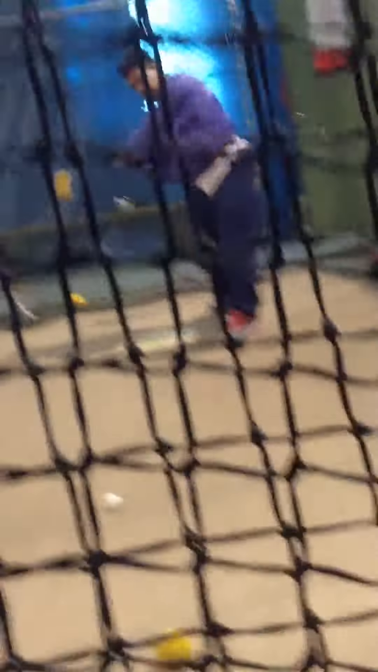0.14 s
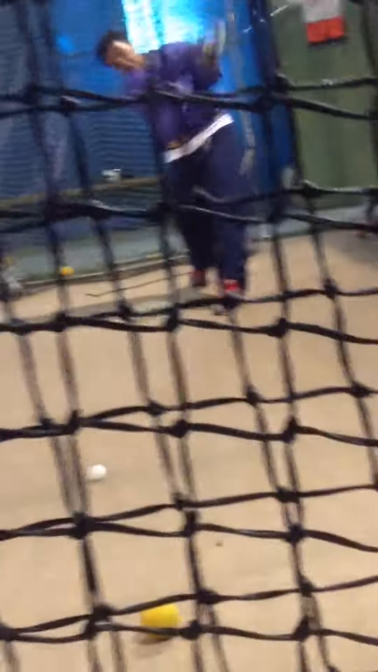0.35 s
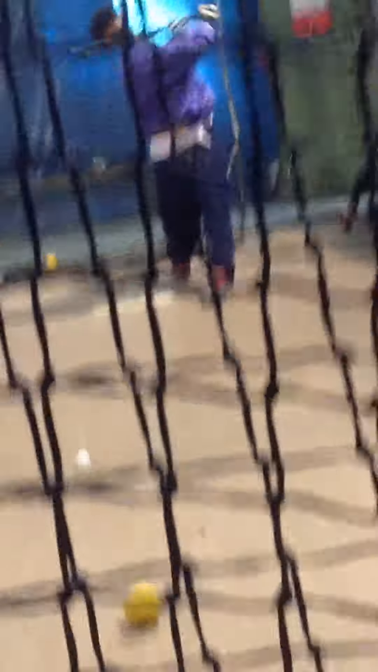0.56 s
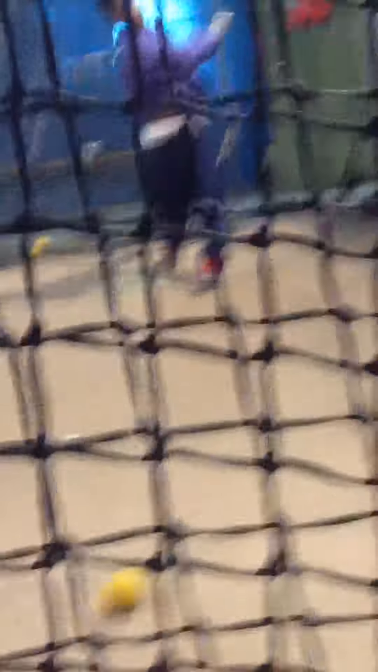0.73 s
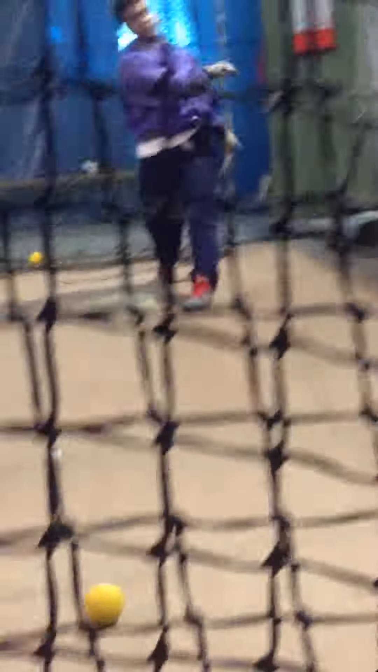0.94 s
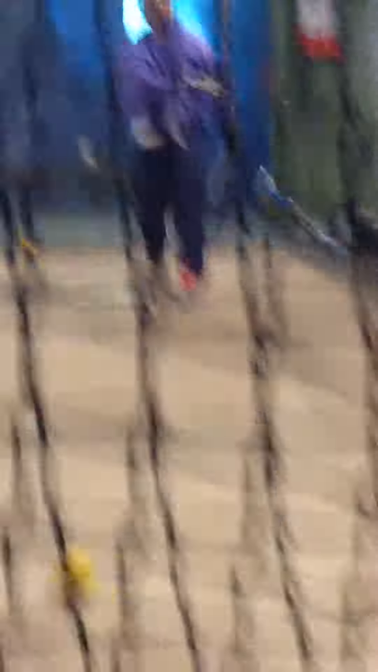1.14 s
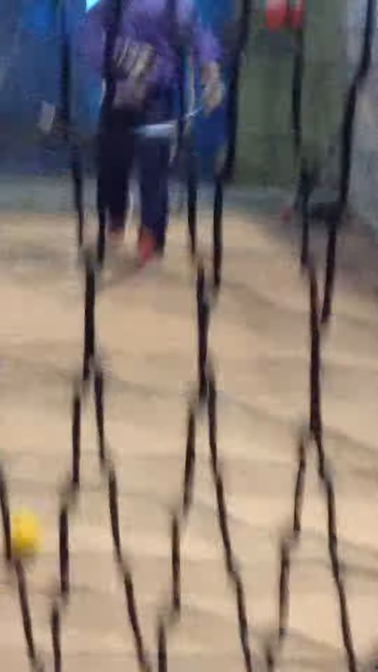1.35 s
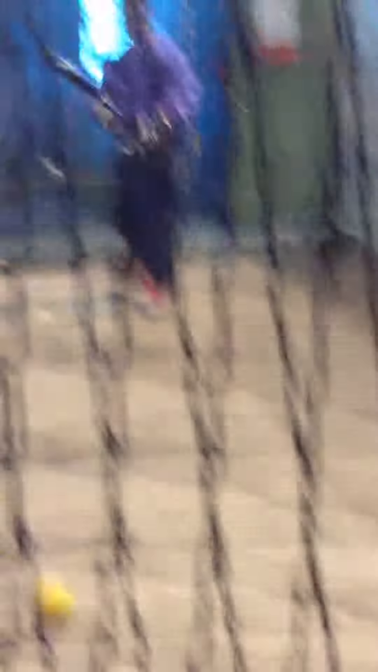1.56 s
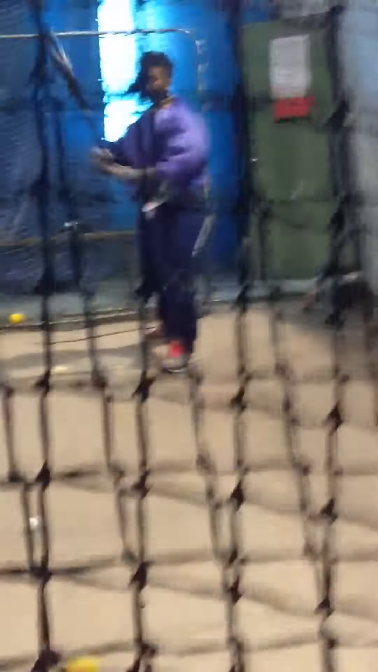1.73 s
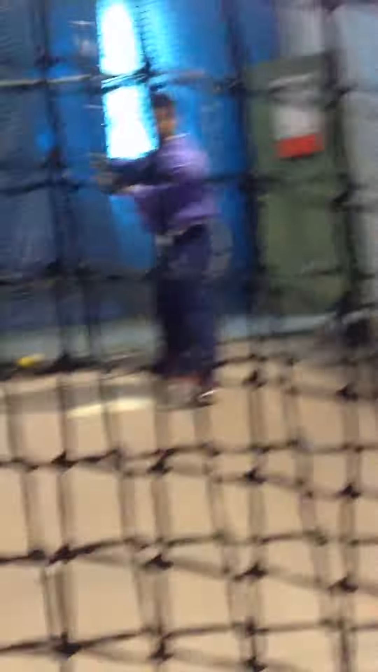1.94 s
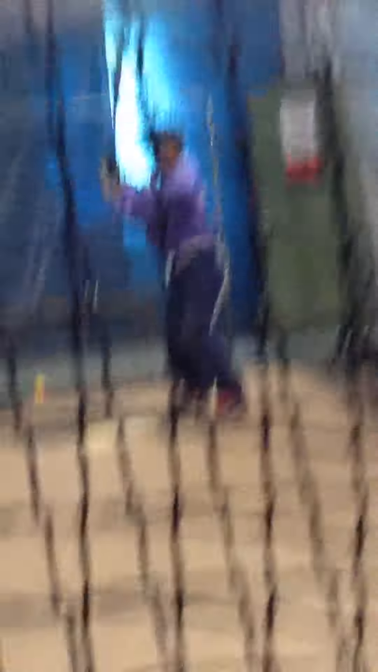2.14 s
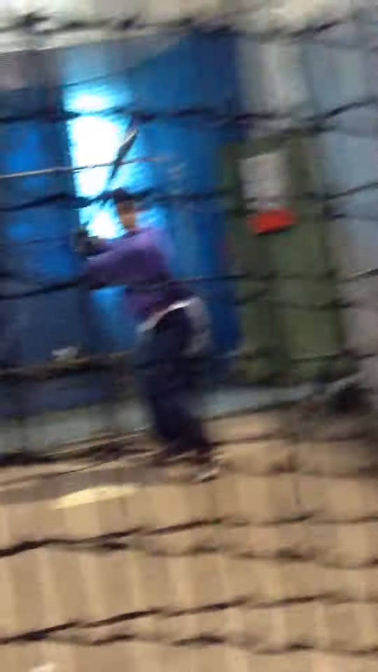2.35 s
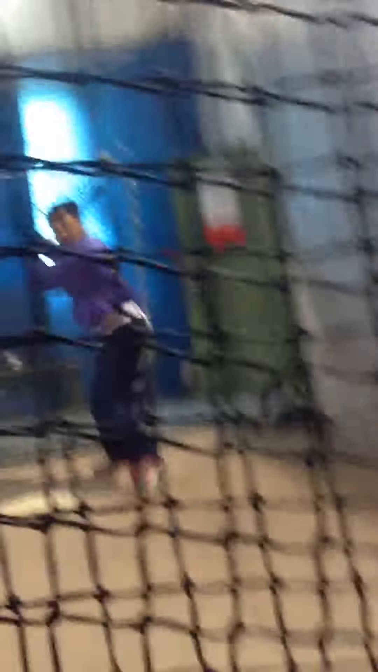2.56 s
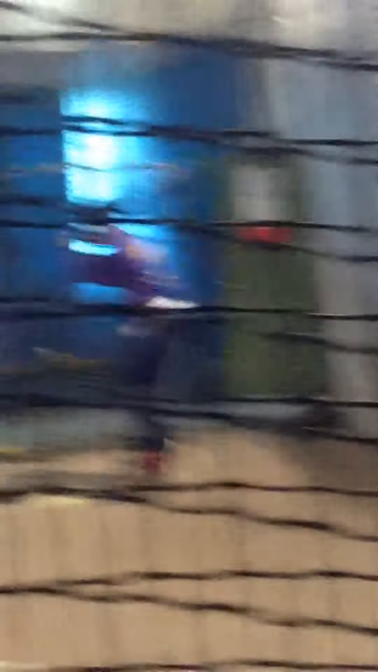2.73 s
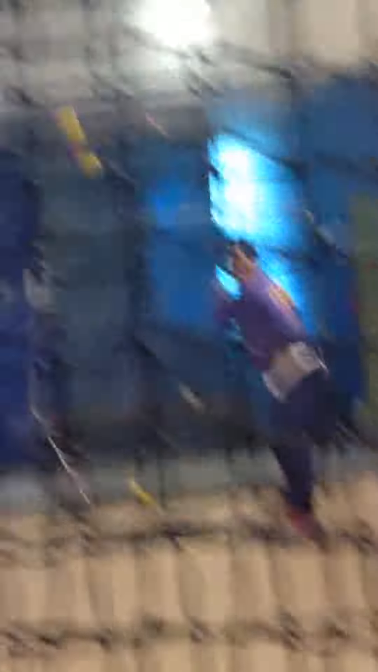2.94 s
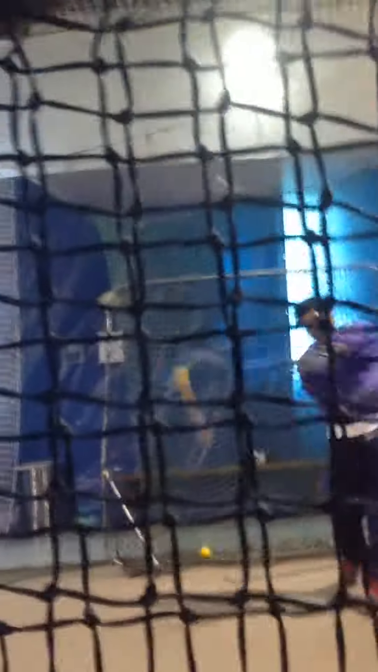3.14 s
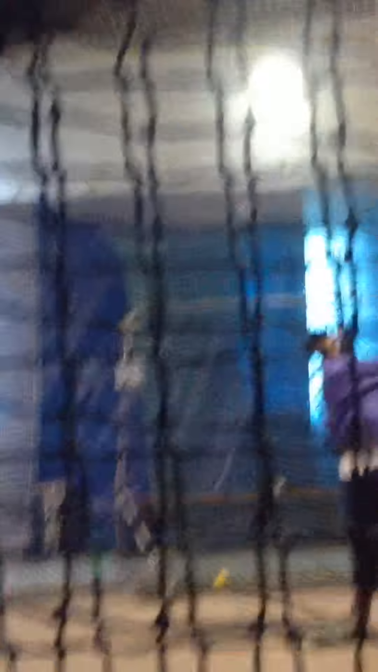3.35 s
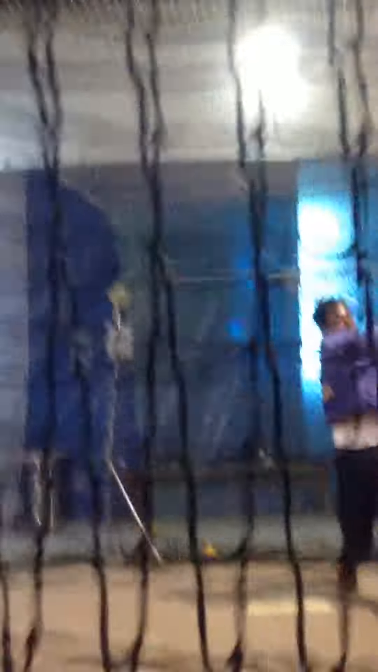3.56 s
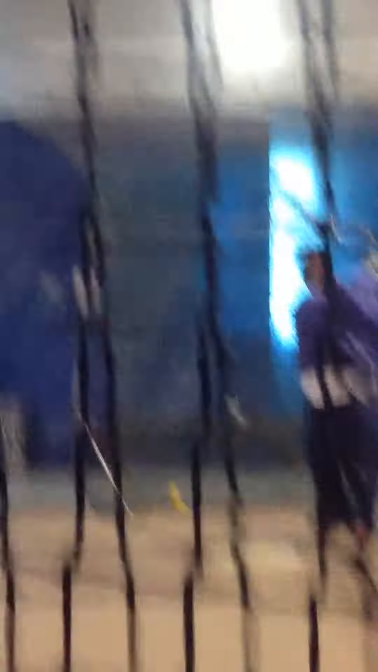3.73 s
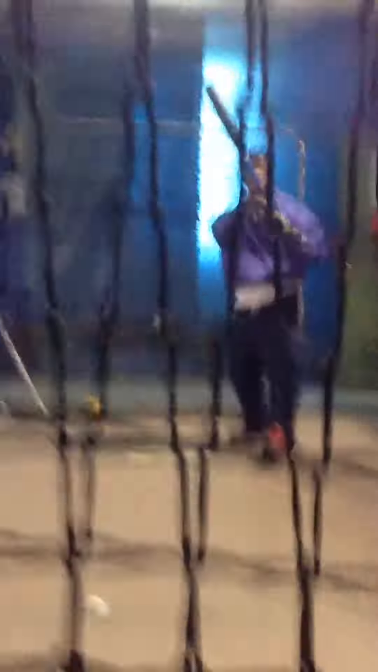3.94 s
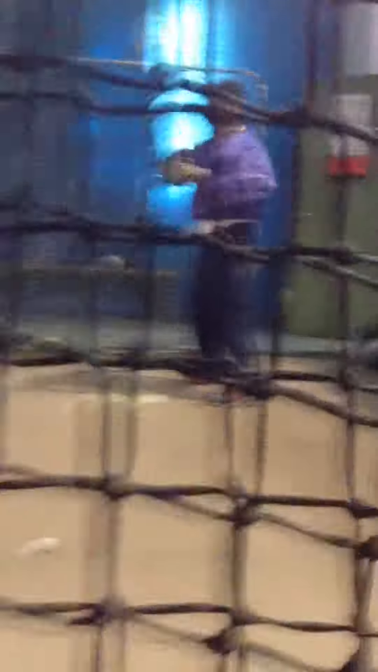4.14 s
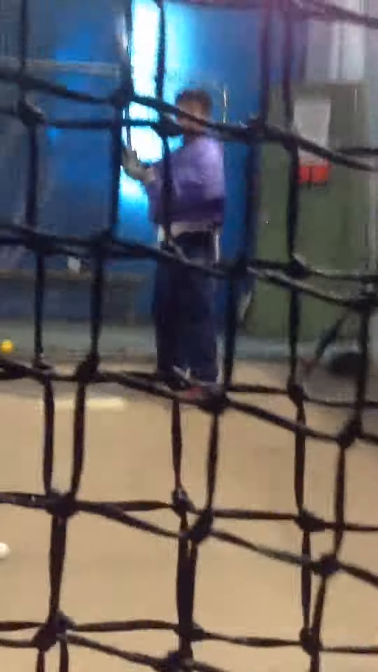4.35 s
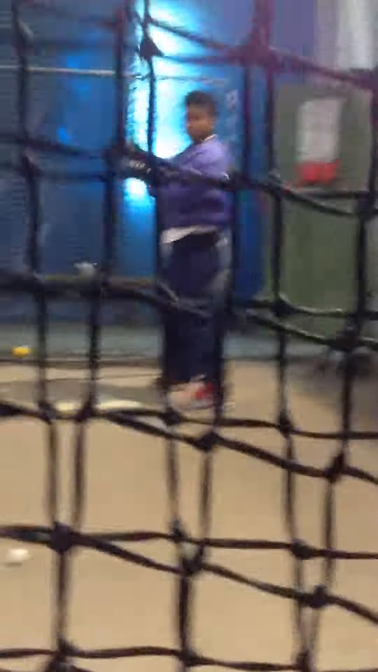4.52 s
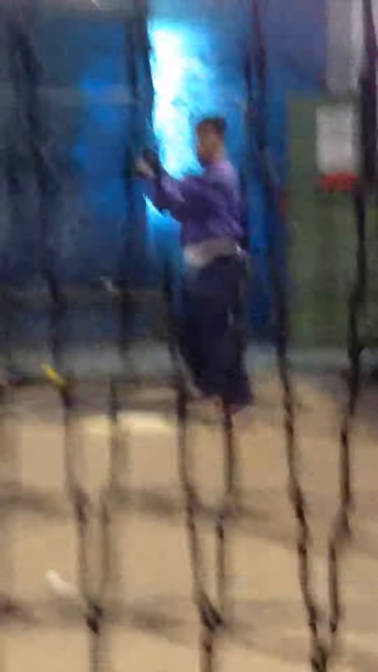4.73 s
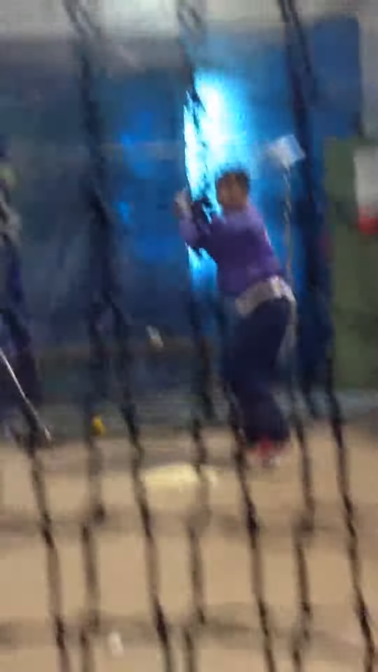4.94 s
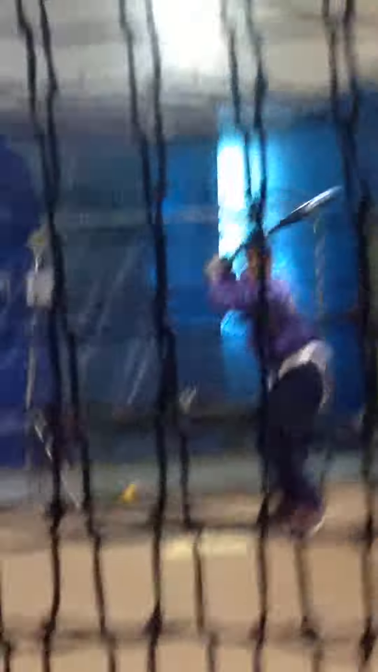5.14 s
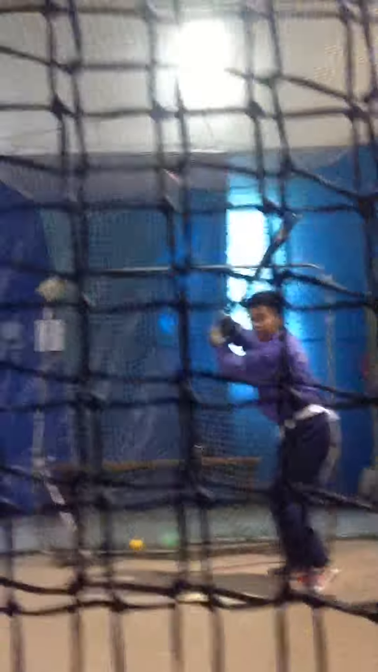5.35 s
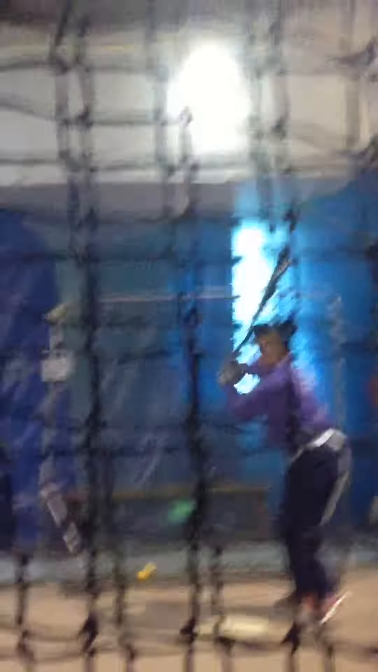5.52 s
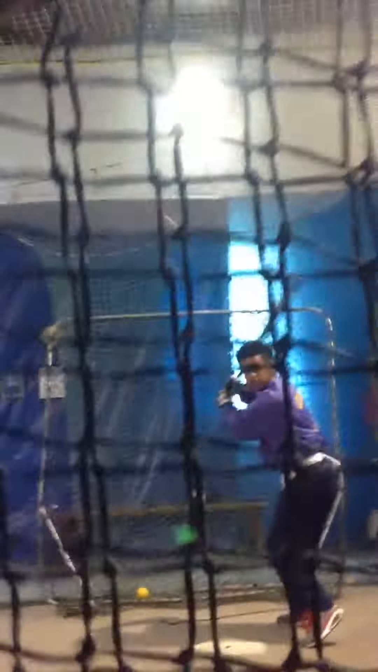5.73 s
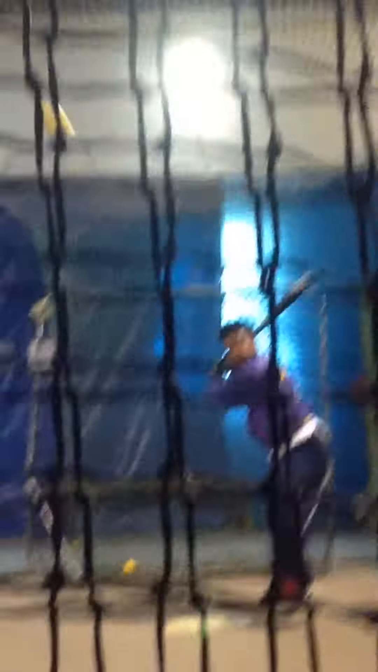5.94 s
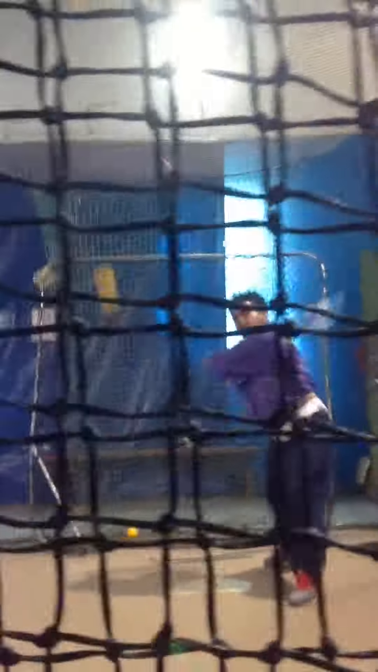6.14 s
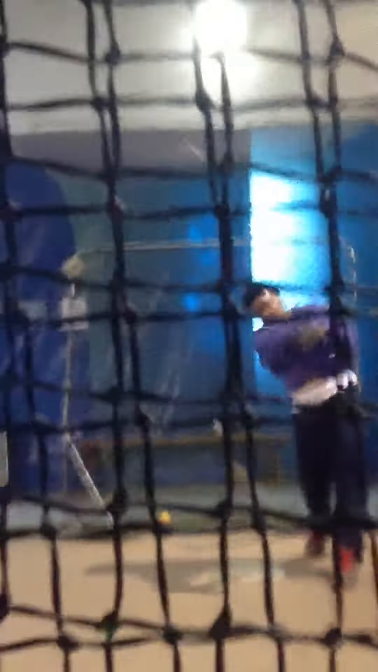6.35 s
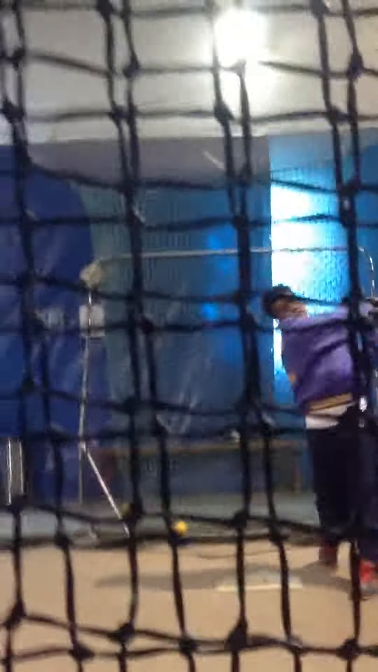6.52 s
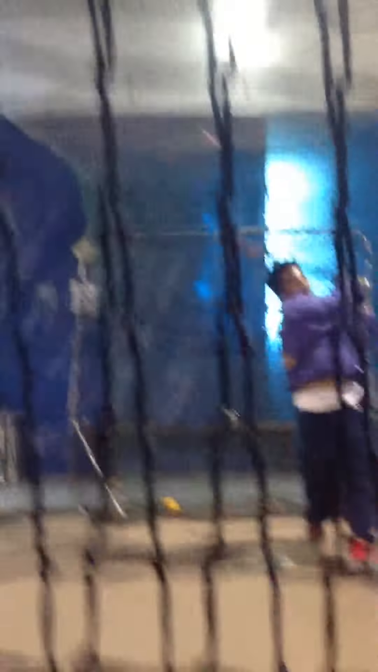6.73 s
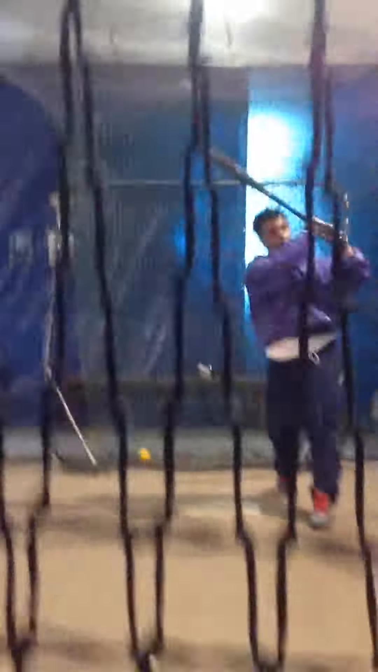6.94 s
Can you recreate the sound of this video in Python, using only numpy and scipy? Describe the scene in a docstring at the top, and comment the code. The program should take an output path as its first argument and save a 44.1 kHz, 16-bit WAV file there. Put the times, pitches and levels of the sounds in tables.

```python
"""Batting practice in a netted indoor hall, over steady ventilation rumble and a faint high whine.
A first bat crack rings the hall, balls slap netting and padding, and others click and thump on the floor.
After a second crack and more slaps, a shoe squeaks and shuffles, balls bounce again and the whine swells once.
A third crack and two last slaps follow. Cracks are pressure spikes with short resonances, slaps noise bursts.
Loud peaks turn the recorder's gain down, and the room noise creeps back up over the next seconds."""
import sys
import numpy as np
from scipy import signal
from scipy.fft import rfft, irfft, next_fast_len
from scipy.io import wavfile
from scipy.ndimage import map_coordinates

SR = 44100
rng = np.random.default_rng(int(sys.argv[2]) if len(sys.argv) > 2 else 0)


def master(y):
    """Save y as 16-bit WAV."""
    cut = np.clip(np.atleast_2d(y).T, -1, 1)
    pcm = np.round(cut * 32767)  # scale
    wavfile.write(sys.argv[1], SR, pcm.astype(np.int16))


N = 312210
TIME = np.arange(N) / SR  # the whole scene [s]
RING = np.arange(SR * 3 // 2) / SR  # time within one struck sound [s]
HZ = np.fft.rfftfreq(len(RING), 1 / SR)


def amp(db):
    """Decibels to gain."""
    return 10 ** (np.asarray(db) / 20)


def unit(x):
    """Scale to rms 1."""
    return x / np.sqrt(np.mean(x ** 2) + 1e-20)


def along(points, hz):
    """Read a curve of (frequency, value) points on a log frequency axis."""
    point_hz, values = np.transpose(points)
    return np.interp(np.log(hz + 1e-6), np.log(point_hz), values)


def wobble(rate):
    """A smooth random curve through rate knots a second."""
    knots = rng.standard_normal(int(N * rate / SR) + 4)
    return map_coordinates(knots, [TIME * rate])


def noise(spectrum):
    """Coloured noise of rms 1; only the shape of the spectrum counts."""
    m = next_fast_len(N)
    white = rfft(rng.standard_normal(m))
    gain = amp(along(spectrum, np.fft.rfftfreq(m, 1 / SR)))
    return unit(irfft(white * gain, m)[:N])


def pulse(db):
    """The sharpest causal pulse with this spectrum: minimum phase, by folding the cepstrum."""
    cepstrum = irfft(np.log(amp(db)))
    half = len(cepstrum) // 2
    folded = np.r_[cepstrum[0], 2 * cepstrum[1:half]]
    return irfft(np.exp(rfft(folded, len(RING))))


def mode(hz, t60):
    """A damped resonance with gain near 1 at its peak; it radiates no deep bass and no hard edge."""
    ratio = 1j * HZ / hz
    width = np.log(1000) / (np.pi * t60 * hz)
    soft_contact = 1 / (1 + ratio / 4 + (ratio / 5) ** 2)
    resonance = width * ratio / (1 + width * ratio + ratio ** 2)
    return irfft(soft_contact * resonance, len(RING))


def decay(t60):
    """An exponential fade by 60 dB in t60 seconds."""
    return np.exp(-np.log(1000) * RING / t60)


def envelope(s, attack, hold, release):
    """Rises exponentially to 1 at s seconds, holds, then dies away."""
    before = np.minimum(TIME - s, 0)
    after = np.maximum(TIME - s - hold, 0)
    return np.exp(before / attack - after / release)


def delayed(x, s):
    """x, s seconds later."""
    return np.pad(x, (max(round(s * SR), 0), 0))[:len(x)]


def through(x, response):
    """Convolve, keeping the length."""
    return signal.fftconvolve(x, response)[:len(x)]


def add(track, s, x):
    """Mix x into the track at s seconds."""
    part = track[round(s * SR):][:len(x)]
    part += x[:len(part)]


# Bat on ball: (time [s], level of the whole hit [dB], floor echo delay [s], tock pitch [Hz],
# tock level [dB], thump level [dB], hall level [dB]); the last three are within the hit
HITS = [(.3334, 2, 0.00071, 1233, 18, 25, 13.5), (3.2454, 1.5, 0.00129, 686, -6, 10, 11.5),
        (6.391, 1.5, .0011, 1030, 5.5, 16.5, 12)]
# Colour of the crack: (frequency [Hz], level [dB])
CRACK_SPECTRUM = [(60, -4.5), (140, -5), (260, 14), (480, 14.5), (750, 12), (1100, 7), (2000, 5.5),
                  (3300, 5.5), (6000, 0.5), (10000, -2), (13500, -4.5), (16000, -10.5)]
# Nearby surfaces: (longest delay [s], echo level [dB]); each echo arrives 2 to 6 % sooner
WALL_ECHOES = [(.0043, -10), (.0056, -8), (.0119, -7), (.0148, -12), (.018, -10)]


def bat():
    """Each hit is one hard pressure spike with a brief tock and thump, doubled by the floor, echoed by walls."""
    track = np.zeros(N)
    spike = pulse(along(CRACK_SPECTRUM, HZ))
    for s, db, floor_delay, tock_hz, tock_db, thump_db, hall_db in HITS:
        tock = amp(tock_db) * mode(tock_hz, t60=0.03)
        thump = amp(thump_db) * mode(hz=216.4, t60=0.041)
        ring = tock + thump
        near = spike + ring + amp(1.5) * delayed(spike, floor_delay)
        for delay, wall_db in WALL_ECHOES:
            near += amp(wall_db) * delayed(spike, delay * rng.uniform(.94, 0.98))
        far = hall(spike + amp(-10) * ring, gap=0.0045, early_db=-15)
        add(track, s, -amp(db) * (near + amp(hall_db) * far))
    return track


# Balls on the floor: (time [s], click level [dB], knock level [dB], knock pitch [Hz], thump level [dB])
BOUNCES = [(1.4135, 13, -17, 350, 28.5), (2.1298, -15, 9, 810, 14.5), (2.586, -1, -2.5, 714, 1),
           (2.8747, -4.5, -6, 680, 1.5), (4.246, -36, -2, 790, -14), (4.451, -15, -2.5, 370, -17),
           (4.695, 14, 9, 430, 19.5), (5.2407, 5, -8, 920, 16.5), (5.6134, -5, -6, 765, 4),
           (5.85, -10, -14, 750, 2.5), (6.195, -28, -14, 576, 6.5)]
# Colour of the click: (multiple of the click pitch [ratio], level [dB])
CLICK_SPECTRUM = [(.1, -36), (.3, -12.5), (.48, -7.5), (.72, -0.5), (1.15, -2), (1.8, -9.5), (2.6, -17),
                  (4, -31), (6, -65.5)]
# A harder bounce is a shorter contact: click pitch at 0 dB, and the level that doubles it
CLICK_HZ, CLICK_DB_PER_OCTAVE = 1950, 40
FAR_WALL_S = .019  # delay of the first hall echo


def bounces():
    """A ball's shell clicks on the floor, brighter when harder, then a short knock and hollow thump ring out."""
    track = np.zeros(N)
    for s, click_db, knock_db, knock_hz, thump_db in BOUNCES:
        click_hz = CLICK_HZ * 2 ** (click_db / CLICK_DB_PER_OCTAVE)
        click = amp(click_db) * pulse(along(CLICK_SPECTRUM, HZ / click_hz))
        knock = amp(knock_db) * mode(knock_hz, t60=.012)
        thump = amp(thump_db) * mode(hz=225.0, t60=0.041)
        # things close by smear the click
        scatter = rng.standard_normal(len(RING)) * np.exp(-RING / 0.0058)
        smear = amp(-8) * through(click, scatter / np.linalg.norm(scatter))
        # the hall hears a shorter thump
        far_thump = amp(thump_db - 15.5) * mode(hz=229, t60=0.013)
        sent = amp(-4.5) * click + amp(-6) * knock + far_thump
        far = hall(sent, gap=FAR_WALL_S, early_db=7)
        add(track, s, click + knock + thump + smear + far)
    return track


# Balls into netting and padding:
# (time [s], slap level [dB], thump level [dB], crackle t60 [s], hall level [dB])
SLAPS = [(.486, -2, 17.5, 0.019, 2.5), (.886, -10.5, -5, .2, 4), (3.348, 4, 24, 0.019, -3.5),
         (3.5994, 10.5, 2, .042, -4.5), (6.5086, 3.5, 17.5, 0.023, 1), (6.672, 0.5, -7, 0.079, -0.5)]
# Colour of the slap before its treble edge: (frequency [Hz], level [dB])
SLAP_SPECTRUM = [(80, -21), (250, -5), (500, 2), (900, 0.5), (1450, 6), (2300, 0.5), (3600, -3.5),
                 (6000, -4), (8500, -10), (12000, -7), (16000, -17)]
SLAP_EDGE_HZ, SOFT_STOP_S = 15000, .15  # treble edge of a quick stop; the t60 that halves it


def slaps():
    """Netting and padding stop a ball with a burst of crackle over a dull thump; soft stops lose treble."""
    track = np.zeros(N)
    for s, db, thump_db, t60, hall_db in SLAPS:
        edge_hz = SLAP_EDGE_HZ / (1 + (t60 / SOFT_STOP_S) ** 4)
        treble_loss_db = 10 * np.log10(1 + (HZ / edge_hz) ** 4)
        snap = amp(db) * pulse(along(SLAP_SPECTRUM, HZ) - treble_loss_db)
        thump = amp(thump_db) * mode(hz=306, t60=0.015)
        crackle = rng.standard_normal(len(RING)) * decay(t60)
        crackle /= np.linalg.norm(crackle)
        crackle[0] += np.exp(-t60 / 0.019)  # a quick stop begins with a hard edge
        far = hall(snap + thump, gap=0.016, early_db=0.5)
        add(track, s, through(crackle, snap) + thump + amp(hall_db) * far)
    return track


# Sole on the floor: (time of the hardest push [s], centre pitch at full push [Hz], level [dB])
SQUEAKS = [(3.829, 2290, -33), (4.052, 2240, -50.5)]
# Squeak harmonics from the first up: (level [dB])
SQUEAK_HARMONICS = [1, -5, -9.5, -15.5, -23]
# Soft scuffs: (time [s], level [dB], half length [s])
SCUFFS = [(4, -52, 0.009), (4.051, -50.5, 0.019), (4.303, -48, 0.023), (4.553, -45.5, 0.0053)]
# Colour of the scuffs: (frequency [Hz], level [dB])
SCUFF_SPECTRUM = [(300, -24), (1200, 8.5), (2400, 9), (4000, 9.5), (6000, -2), (9000, -7), (15000, -25.5)]
SQUEAK_ATTACK_S, SQUEAK_RELEASE_S = 0.0056, 0.0122  # time constants of the push
SQUEAK_SAG = .055  # share by which the pitch lies flat while the sole barely presses


def shoes():
    """A rubber sole sticks and slips in short rough squeaks, louder and higher as it presses, and shuffles."""
    squeak = np.zeros(N)
    jitter = 1 + .028 * wobble(900)
    chatter = 1 + .3 * wobble(500)
    for s, pitch_hz, db in SQUEAKS:
        push = envelope(s, SQUEAK_ATTACK_S, 0, SQUEAK_RELEASE_S)
        sag = 1 - SQUEAK_SAG * (1 - push) ** 4
        phase = 2 * np.pi * np.cumsum(pitch_hz * jitter * sag) / SR
        tone = sum(amp(level) * np.sin(k * phase) for k, level in enumerate(SQUEAK_HARMONICS, 1))
        squeak += amp(db) * push * chatter * tone
    grit = noise(SCUFF_SPECTRUM)
    scuffs = grit * sum(amp(level) * np.exp(-((TIME - s) / half) ** 2) for s, level, half in SCUFFS)
    far = hall(amp(-8) * squeak + amp(-3) * scuffs, gap=.012, early_db=-3)
    return squeak + scuffs + far


# Bat and sleeves through the air: (frequency [Hz], level [dB])
SWISH_SPECTRUM = [(100, -15), (300, 8), (1000, -10.5), (3000, -5.5), (8000, -12.5), (15000, -19.5)]


def swings():
    """The bat and the batter's sleeves swish faintly, swelling up to the hit and fading after it."""
    swell = sum(np.exp(-np.abs(TIME - s) / 0.04) * amp(db - 50.0) for s, db, *_ in HITS)
    return swell * noise(SWISH_SPECTRUM)


# Colour of the ventilation hiss: (frequency [Hz], relative density [dB per Hz])
AIR_SPECTRUM = [(40, -64), (75, -29), (106, -7), (140, -3), (195, 0.5), (240, 0.5), (320, -11),
                (430, -18.5), (570, -8.5), (700, -7), (1500, -13), (4700, -26), (6600, -28.5),
                (7300, -34.5), (15500, -41)]
AIR_DB = -54.5  # centre level of the direct hiss; echo paths and drone come on top


def ventilation():
    """Air rumbles with a wavering drone; fixed echo paths from the fan carve fine steady ripples in the hiss."""
    path_spectrum = [(300, -13.0), (1500, -16), (3500, 1), (5800, -2.0), (9000, -7.5)]  # ([Hz], [dB])
    paths = rng.standard_normal(len(RING)) * np.exp(-RING / 0.013)
    paths = through(paths / np.linalg.norm(paths), pulse(along(path_spectrum, HZ)))
    hiss = noise(AIR_SPECTRUM)
    drone_hz = 204 + 12 * wobble(9.5)
    drone = np.sin(2 * np.pi * np.cumsum(drone_hz) / SR) * amp(-17 + 2.2 * wobble(11))
    return amp(AIR_DB + 0.54 * wobble(11)) * (hiss + through(hiss, paths) + drone)


# Colour of the whine's noise: (frequency [Hz], level [dB])
WHINE_SPECTRUM = [(4500, -65), (5150, -26.5), (5225, 22), (5290, -5.5), (5370, -22.5), (6000, -50)]
# The whine rises once: (start of the hold [s], hold [s], level added to the resting whine [dB])
WHINE_SWELL = (5.26, .58, -70.5)
WHINE_DB = -78.5  # the whine at rest
WHINE_ATTACK_S, WHINE_RELEASE_S = 0.035, .15  # time constants of the swell


def whine():
    """A thin whistle, narrow noise around a slightly unsteady tone, sits above the air."""
    whistle = np.sin(2 * np.pi * np.cumsum(5240 + 9 * wobble(44)) / SR)
    start, hold, swell_db = WHINE_SWELL
    swell = envelope(start, WHINE_ATTACK_S, hold, WHINE_RELEASE_S)
    level = amp(WHINE_DB) + amp(swell_db) * swell
    return level * unit(noise(WHINE_SPECTRUM) + amp(3.5) * whistle)


# Fade of the wash: (frequency [Hz], t60 [s])
HALL_DECAY = [(100, 1.34), (230, 0.8), (500, 0.74), (1000, 0.81), (2000, 0.84), (4800, 0.85), (8000, 0.67),
              (12000, 0.42), (16000, 0.34)]
# Standing waves: (frequency [Hz], level before the hall's colour [dB], t60 [s])
HALL_MODES = [(157.9, -59, 1), (214.4, -54.5, 0.97), (427.4, -59.5, 0.58), (582, -59.5, 0.95)]
# Colour of the whole answer: (frequency [Hz], level [dB])
HALL_SPECTRUM = [(60, -31.5), (120, -5.5), (170, 5.5), (270, 1), (360, -0.5), (560, -0.5), (1100, -4),
                 (2200, -5), (6000, -4), (15000, -0.5)]


def hall(x, gap, early_db, grain=0.54, grain_life=0.046, early_life=0.031):
    """After a gap [s], strong separate echoes merge into a wash whose pitches die at their own rates."""
    spread = grain * np.exp(-RING / grain_life)  # uneven echo strengths even out
    strengths = rng.standard_normal(len(RING))
    echoes = strengths * np.exp(spread * rng.standard_normal(len(RING)) - spread ** 2)
    hz, t, bands = signal.stft(echoes, SR, nperseg=512)
    fade = np.exp(-np.log(1000) * t / along(HALL_DECAY, hz)[:, None])
    tail = signal.istft(bands * fade, nperseg=512)[1][:len(RING)]
    early = amp(early_db) * np.exp(-RING / early_life)
    tail *= (1 + early) / np.linalg.norm(tail)
    for mode_hz, db, t60 in HALL_MODES:
        wave = np.sin(2 * np.pi * (mode_hz * RING + rng.random()))
        tail += amp(db) * decay(t60) * wave
    tail *= 1 - np.exp(-(RING / gap) ** 8)  # silent until the first echo
    return through(x, through(tail, pulse(along(HALL_SPECTRUM, HZ))))


DUCK_ABOVE_DB, DUCK_ATTACK_S, RECOVER_DB_PER_S = -5.5, 0.0034, 2.01


def gain_control(x):
    """A loud peak turns the gain down within milliseconds; it creeps back over the next seconds."""
    over_db = np.maximum(20 * np.log10(np.abs(x) + 1e-9) - DUCK_ABOVE_DB, 0)
    recovery_db = RECOVER_DB_PER_S * TIME
    # hold the deepest duck so far, less what has recovered since
    duck_db = np.maximum.accumulate(over_db + recovery_db, axis=-1) - recovery_db
    keep = np.exp(-1 / (DUCK_ATTACK_S * SR))
    return x * amp(-signal.lfilter([1 - keep], [1, -keep], duck_db))


def scene():
    """Everything in the hall, in one channel."""
    struck = swings() + bat() + bounces() + slaps()
    return (struck + shoes() + ventilation() + whine())[None]


TOP_HZ = 15450  # upper band limit


def record(dry):
    """A small microphone: thin bass, overload on the hardest spikes, gain control, a steep band limit."""
    thin = signal.sosfilt(signal.butter(2, 125, 'high', fs=SR, output='sos'), dry)
    ducked = gain_control(np.clip(thin, -1, 1))
    m = next_fast_len(N + SR // 2)
    band = 1 / np.sqrt(1 + (np.fft.rfftfreq(m, 1 / SR) / TOP_HZ) ** 260)
    return irfft(rfft(ducked, m) * band, m)[..., :N]


dry = scene()
out = record(dry)
master(out)
```